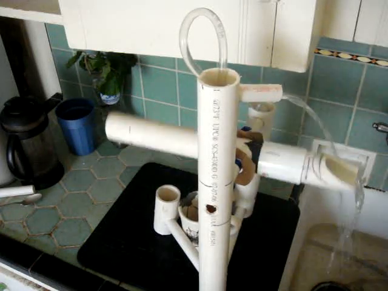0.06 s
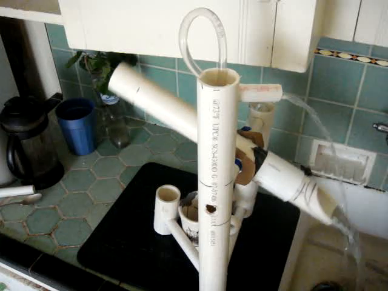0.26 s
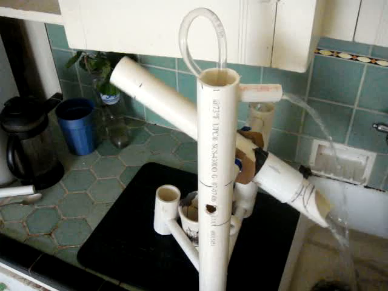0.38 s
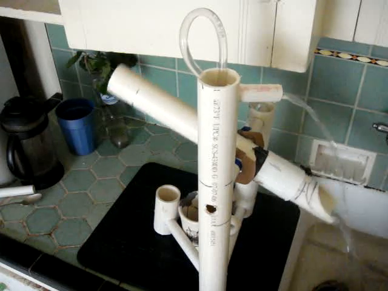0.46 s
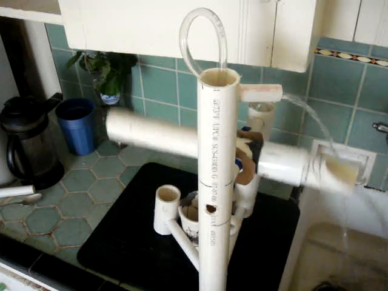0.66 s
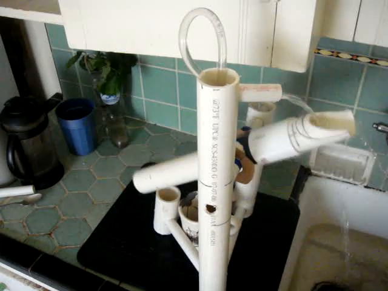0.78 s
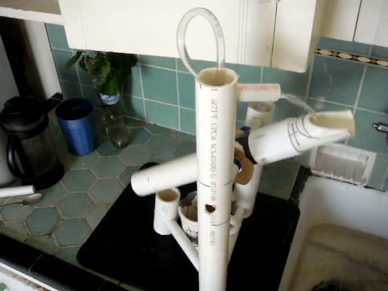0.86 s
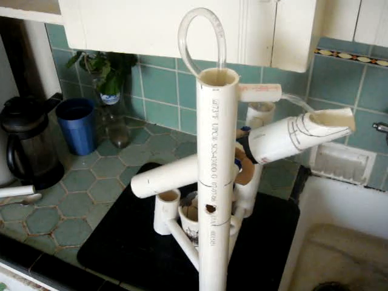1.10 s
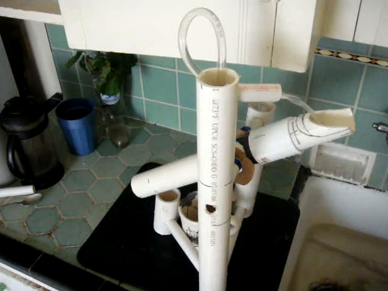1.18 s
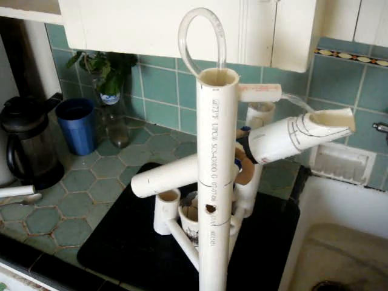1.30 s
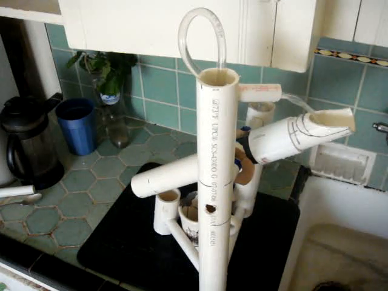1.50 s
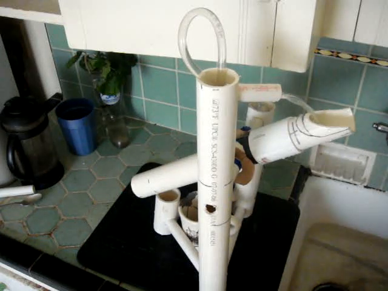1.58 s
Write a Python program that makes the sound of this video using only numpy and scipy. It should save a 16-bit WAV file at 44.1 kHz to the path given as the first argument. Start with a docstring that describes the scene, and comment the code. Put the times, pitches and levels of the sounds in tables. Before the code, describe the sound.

A loud, gurgling splash of water pours into a kitchen sink, fading to a light trickle.

```python
"""Tipping tube over a kitchen sink

Close to the basin in a tiled kitchen, one mono microphone. A pivoted plastic tube dumps its water:
the first slug lands with a glug of trapped air, the stream spatters and thumps on the basin, and a
last heavy splat falls as the tube swings back. A thin trickle and a few drips ring over a faint hum."""
import sys
import numpy as np
from scipy import signal
from scipy.fft import rfft, irfft
from scipy.io import wavfile

SR = 44100
rng = np.random.default_rng(int(sys.argv[2]) if len(sys.argv) > 2 else 0)


def put_to_file(sound):
    """Save the sound as 16-bit audio at rate SR, in the file named by the first command-line argument."""
    columns = np.atleast_2d(sound).T  # one column per channel
    safe = np.clip(columns, -1, 1)
    whole_steps = np.round(safe * 32767)
    wavfile.write(sys.argv[1], SR, whole_steps.astype(np.int16))


N = 72765
TIME = np.arange(N) / SR

# strength of the stream on the basin: t/s, level/dB
STREAM_FLOW = [(.228, -80), (.24, -30.5), (.262, -37.5), (.29, -30.5), (.318, -23.5), (.37, -24.5),
               (.46, -23.5), (.54, -25.5), (.61, -26), (.68, -27), (.72, -23.5), (.8, -24), (.87, -26),
               (.95, -32.5), (1.03, -33), (1.12, -57), (1.25, -59), (1.4, -83)]
# the stream's fine spray: f/Hz, level/dB
SPRAY_SPECTRUM = [(100, -17), (250, -5.5), (500, -1.5), (1000, -3.5), (1900, -4), (2700, 1.5), (3500, -7),
                  (4800, -1.5), (7000, -6.5), (10000, -13)]
# the stream's small bubbles: f/Hz, level/dB
FIZZ_SPECTRUM = [(300, -8), (600, -1), (1100, -3.5), (1900, 6.5), (2700, -1.5), (3600, 0), (4800, -2),
                 (7000, -3.5), (10000, -9)]
# lumps of water hitting the basin: t/s, level/dB, t60/s, low edge/Hz
LUMP_SLAPS = [(0.219, -35, 0.005, 6500), (0.238, -20, 0.057, 500), (0.2719, -16.5, 0.11, 2400),
              (0.305, -16.5, 0.068, 1500), (.324, -21, .04, 1400), (0.339, -18.5, 0.1, 3500),
              (0.386, -25, 0.044, 1600), (0.4084, -21.5, 0.018, 1600), (0.4495, -27, 0.016, 2000),
              (0.5783, -22, 0.08, 900), (0.6266, -21.5, 0.054, 1200), (0.6513, -21.5, 0.074, 1200),
              (0.7002, -17.5, 0.02, 4500), (0.759, -18, .03, 1300), (0.833, -23.5, 0.024, 1500),
              (0.883, -22, 0.05, 1500), (0.938, -21, 0.048, 5500), (0.957, -18, 0.062, 600),
              (1.003, -24, .05, 600), (1.141, -30.5, 0.054, 6500), (1.219, -31, 0.022, 6000),
              (1.2325, -29, 0.013, 6500)]
# colour of a slap before its low cut: f/Hz, level/dB
SLAP_SPECTRUM = [(100, 8), (1100, 0), (3000, -0.5), (4000, -1), (5200, -0.5), (10000, -6)]
# hollow colour of the last splat: f/Hz, level/dB
SPLAT_SPECTRUM = [(150, -21), (400, -10), (620, 0.5), (1300, -3), (1900, 1.5), (2600, -2.5), (3600, -20),
                  (5200, -14.5), (9000, -13.5)]
# large trapped air pockets: t/s, level/dB, f/Hz, t60/s
AIR_POCKETS = [(.2385, -14.5, 558, 0.091), (.262, -13.5, 598, .07), (.279, -25, 625, 0.15),
               (.292, -16, 618, 0.044), (.31, -28.5, 541, 0.15), (0.3227, -12.5, 1865, 0.027),
               (0.346, -36, 1030, 0.087), (.347, -13.5, 2724, .025), (.36, -28, 497, 0.053),
               (0.3884, -12.5, 1915, .03), (.409, -21.5, 309, 0.056), (.411, -13.5, 2063, 0.032),
               (0.419, -19.5, 159, 0.052), (.445, -23, 370, 0.17), (0.449, -17, 2740, 0.044),
               (.491, -15, 4580, 0.032), (.497, -20.5, 1910, 0.012), (0.5786, -10.5, 1161, 0.019),
               (0.58, -14, 3165, 0.024), (0.631, -18, 2750, .02), (0.639, -10, 1706, 0.017),
               (0.646, -28, 365.4, 0.29), (0.6498, -9.5, 4810, 0.022), (0.672, -16.5, 1830, .03),
               (.683, -20, 955, 0.032), (0.691, -20, 2540, 0.05), (.725, -21, 1114, 0.074),
               (.76, -14, 1655, 0.036), (0.776, -24, 294, 0.046), (.776, -17, 2400, 0.033),
               (0.831, -12.5, 2554, 0.039), (0.841, -25, 1880, 0.064), (.89, -20, 2016, 0.1)]
# loads of water on the basin floor: t/s, level/dB
BASIN_THUDS = [(0.238, -24.5), (.278, -31), (0.302, -27), (0.332, -23), (0.411, -33), (0.568, -28),
               (0.596, -24.5), (0.651, -21), (0.702, -19.5), (.759, -28), (0.809, -25.5), (0.84, -25),
               (.92, -35)]
# the basin under the stream: f/Hz, level/dB
RUMBLE_SPECTRUM = [(25, 0.5), (50, -12.5), (90, -5.5), (180, -7), (400, -31.5), (2000, -80)]
# single drips: t/s, tick level/dB, bubble level/dB, f/Hz
DRIPS = [(1.07, -34, -26.5, 1755), (1.0945, -26, -25, 3250), (1.146, -33.5, -25.5, 3430),
         (1.181, -30.5, -20.5, 3650), (1.3922, -64, -25.5, 2282), (1.426, -29.5, -24.5, 2950),
         (1.5528, -56, -24, 2173)]
# a drip's impact: f/Hz, level/dB
TICK_SPECTRUM = [(500, -31), (1400, -17), (2100, -7.5), (3200, 8), (4500, -3.5), (10000, -11.5)]
# the thin trickle: f/Hz, level/dB
TRICKLE_SPECTRUM = [(300, -30), (1500, -13), (2600, -8.5), (3900, 2), (5000, 4.5), (7000, -2),
                    (10000, -1.5)]
# feed water pattering in the empty tube: f/Hz, level/dB
REFILL_SPECTRUM = [(2000, -27), (5500, -16), (7500, 0), (9500, 0)]
# steady hiss of the feed water: f/Hz, level/dB
FEED_SPECTRUM = [(1500, -30), (2600, -10), (2950, 4.5), (3300, -21), (5400, -5.5), (7000, -7.5),
                 (10000, -16)]
# an appliance's hum lines: f/Hz, level/dB
HUM_LINES = [(59, -58.5), (203, -59), (477, -60), (715, -60.5)]
# the kitchen's room tone: f/Hz, level/dB
ROOM_TONE_SPECTRUM = [(25, -22), (50, -21), (80, -16), (110, -14), (165, -1.5), (330, -1.5), (700, -6),
                      (1300, -8.5), (2400, -11.5), (5500, -27.5), (10000, -22)]

IMPACTS_PER_S, REFLECTION_DELAY_S, CUTOFF_HZ = 7000, 0.006, 10250


def stream():
    """Water pours on the basin near the microphone; spray and bubbles follow the flow."""
    spray = from_db(-1) * spatter(SPRAY_SPECTRUM, flutter_db=5.5)
    fizz = from_db(-2) * bubble_cloud(FIZZ_SPECTRUM, per_s=2200, cycles=36, spread_db=2.5)
    return flow() * (spray + fizz)


def flow():
    """Strength of the stream over time, as a gain."""
    return from_db(np.interp(TIME, *np.transpose(STREAM_FLOW)))


def slaps():
    """Each lump wets the basin gradually, swelling into a short shower; small lumps have less bass."""
    out, attack_s = 0, 0.0031
    for start, db, t60, edge_hz in LUMP_SLAPS:
        swell = np.clip((TIME - start) / attack_s + 1, 0, 1) ** 2
        low_cut = signal.butter(3, edge_hz, "high", fs=SR, output="sos")
        shower = coloured(signal.sosfilt(low_cut, clicks(IMPACTS_PER_S, spread_db=1)), SLAP_SPECTRUM)
        out += from_db(db) * swell * burst(start - attack_s, t60, hold=attack_s) * shower
    return out


def last_splat():
    """A heavy load falls as the tube swings back, longer and hollower than the slaps."""
    return from_db(-19) * burst(0.831, t60=0.44, hold=0.025) * spatter(SPLAT_SPECTRUM, flutter_db=2)


def glugs():
    """Air pockets ring in the pooled water, the biggest lowest; the basin walls blur them."""
    plops = sum(from_db(db) * bubble(start, hz, t60, attack=0.0012, rise_per_s=0.75)
                for start, db, hz, t60 in AIR_POCKETS)
    walls = [(600, -7), (1500, 0), (5000, -4.5), (10000, -7.5)]  # f/Hz, level/dB
    return plops + from_db(-7.5) * reflections(plops, walls, t60=0.14)


def thuds():
    """The basin floor gives a dull, quickly damped swing under each load."""
    out = 0
    for start, db in BASIN_THUDS:
        hz = rng.uniform(31.5, 62.16)
        out += from_db(db) * bubble(start, hz, t60=0.037, attack=0.0036, rise_per_s=0)
    return out


def rumble():
    """The basin rumbles for as long as the heavy stream bears on it."""
    return from_db(-16.5) * flow() * burst(0, t60=0.57, hold=0.87) * noise(RUMBLE_SPECTRUM)


def drips():
    """Each drip ticks on impact and leaves a small bubble, whose note lingers in the basin."""
    tick, out = noise(TICK_SPECTRUM), 0
    for start, tick_db, bubble_db, hz in DRIPS:
        note = bubble(start, hz, t60=0.03, attack=0.00067, rise_per_s=3.2)
        ring = noise([(hz * 0.8, -30), (hz, 0), (hz * 1.25, -30)])
        note += from_db(-18.5) * burst(start, t60=0.2) * ring
        out += from_db(tick_db) * burst(start, t60=0.081) * tick + from_db(bubble_db) * note
    return out


def trickle():
    """A soft patter with tiny bubbles fades as the sink drains."""
    start_s, fade_db_per_s = 0.87, 26
    age = TIME - start_s
    fizz = from_db(-0.5) * bubble_cloud(TRICKLE_SPECTRUM, per_s=2500, cycles=40, spread_db=3)
    patter = spatter(TRICKLE_SPECTRUM, flutter_db=3.5)
    return (age > 0) * from_db(-37.5 - fade_db_per_s * age) * (patter + fizz)


def refill(start_s=1.6):
    """A fine, high patter at the very end, as feed water runs into the empty tube."""
    gain = (TIME > start_s) * from_db(-51.5 + 3.5 * drift(per_s=50))
    return gain * coloured(clicks(IMPACTS_PER_S, spread_db=13), REFILL_SPECTRUM)


def kitchen(water):
    """Basin and tiles throw the sound back to the microphone, duller at the top."""
    tiles = [(100, -0.5), (600, -4.5), (2500, -2), (10000, -21)]  # f/Hz, level/dB
    return from_db(-12.5) * reflections(water, tiles, t60=0.52)


def background():
    """Behind the sink: an appliance's hum, the faint hiss of the feed water and steady room tone."""
    hum = sum(from_db(db) * np.sqrt(2) * np.sin(2 * np.pi * hz * TIME + 0.27 * drift(per_s=26))
              for hz, db in HUM_LINES)
    feed = from_db(-53.5) * noise(FEED_SPECTRUM)
    return hum + feed + from_db(-48.5) * noise(ROOM_TONE_SPECTRUM)


def spatter(spectrum, flutter_db):
    """Dense tiny impacts; each band swells and sinks on its own."""
    out, edges = 0, np.geomspace(500, CUTOFF_HZ, 9)
    for low, high in zip(np.r_[30, edges], edges):
        band_pass = signal.butter(2, [low, high], "band", fs=SR, output="sos")
        band = signal.sosfilt(band_pass, clicks(IMPACTS_PER_S, spread_db=3.5))
        out += band * from_db(flutter_db * np.clip(drift(per_s=80), -2, 2))
    return coloured(out, spectrum)


def bubble(start, hz, t60, attack, rise_per_s):
    """A damped tone that swells and rings; a bubble's pitch rises as it nears the surface."""
    age = np.maximum(TIME - start, 0)
    swell = 1 - np.exp(-(age / attack) ** 2)
    phase = 2 * np.pi * hz * age * (1 + rise_per_s * age / 2)
    return swell * burst(start, t60, hold=attack) * np.sin(phase)


def bubble_cloud(spectrum, per_s, cycles, spread_db, pitches=70):
    """Many small bubbles, each at a random pitch, dying by 60 dB over the given cycles."""
    births, pitch_index, out = clicks(per_s, spread_db), rng.integers(0, pitches, N), 0
    for k, hz in enumerate(np.geomspace(spectrum[0][0], spectrum[-1][0], pitches)):
        radius = np.exp(-np.log(1000) * hz / (cycles * SR))
        poles = [1, -2 * radius * np.cos(2 * np.pi * hz / SR), radius ** 2]
        ringing = signal.lfilter([1, 0, -1], poles, births * (pitch_index == k) + 1e-18)
        out += gain_at(spectrum, hz) * hz * ringing
    return unit_power(out)


def reflections(x, spectrum, t60):
    """Dense echoes off hard surfaces: a decaying tail of noise."""
    tail = noise(spectrum) * burst(REFLECTION_DELAY_S, t60)
    return signal.fftconvolve(x, tail / np.sqrt(2 * np.sum(tail ** 2)))[:N]


def clicks(per_s, spread_db):
    """Random impacts of uneven size and sign."""
    sizes = from_db(spread_db * np.minimum(rng.exponential(1, N), 3))
    return (rng.random(N) < per_s / SR) * sizes * rng.choice([-1, 1], N)


def burst(start, t60, hold=0):
    """Sudden attack, hold, exponential release; times in seconds."""
    return (TIME >= start) * from_db(-60 * np.maximum(TIME - start - hold, 0) / t60)


def drift(per_s):
    """Smooth random wander of spread 1."""
    knots = rng.standard_normal(1000)
    return unit_power(np.interp(TIME * per_s, np.arange(len(knots)), knots))


def noise(spectrum):
    """Steady coloured noise at unit power."""
    return coloured(rng.standard_normal(N), spectrum)


def coloured(x, spectrum):
    """Filter a sound by a spectrum; unit power."""
    hz = np.maximum(np.arange(N + 1) * SR / (2 * N), 20)
    gain = gain_at(spectrum, hz) * (hz < CUTOFF_HZ)
    return unit_power(irfft(rfft(x, 2 * N) * gain)[:N])


def gain_at(spectrum, hz):
    """A spectrum's gain, interpolated over log frequency."""
    knots_hz, knots_db = np.transpose(spectrum)
    return from_db(np.interp(np.log(hz), np.log(knots_hz), knots_db))


def from_db(db):
    """Decibels to gain."""
    return 10 ** (np.asarray(db) / 20)


def unit_power(x):
    """Scale to an RMS of 1."""
    return x / np.sqrt(np.mean(x ** 2) + 1e-20)


def scene():
    """At the microphone: water and basin up close, the kitchen behind."""
    water = stream() + slaps() + last_splat() + glugs() + drips() + trickle() + refill()
    return (water + kitchen(water) + thuds() + rumble() + background())[None]


def record(dry):
    """The microphone signal is cut steeply above about 10 kHz."""
    low_pass = signal.ellip(12, 0.2, 80, CUTOFF_HZ - 150, fs=SR, output="sos")
    return signal.sosfilt(low_pass, dry)


dry = scene()
out = record(dry)
put_to_file(out)
```